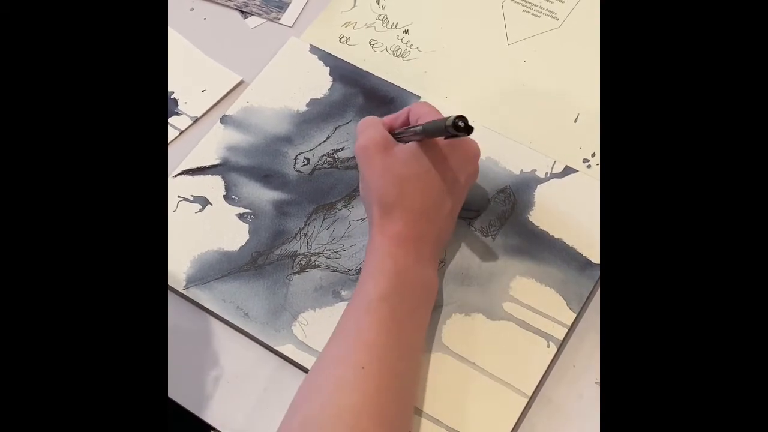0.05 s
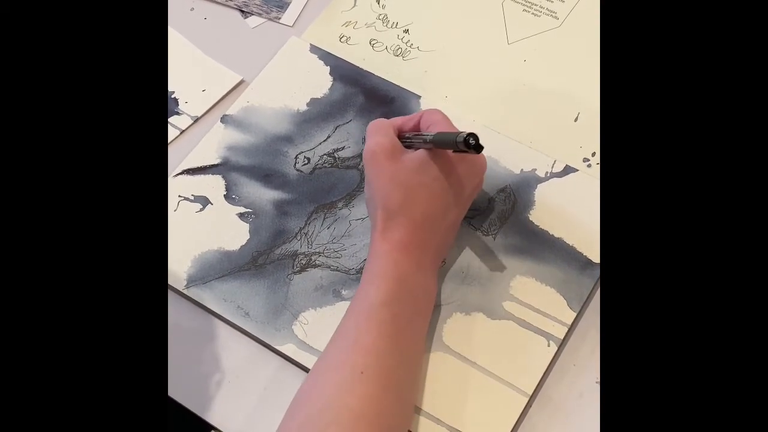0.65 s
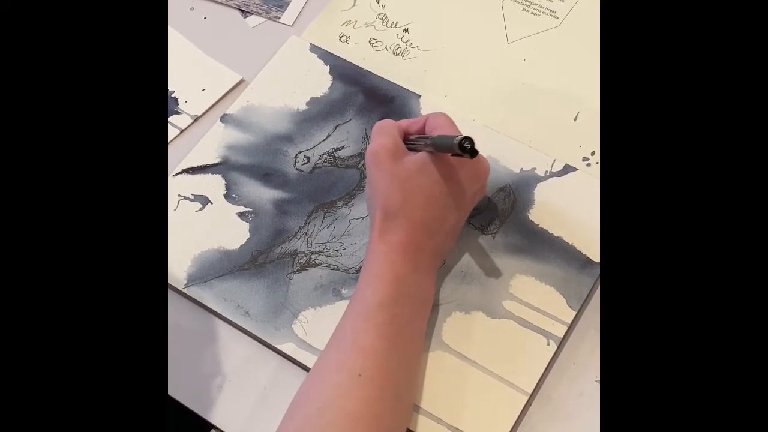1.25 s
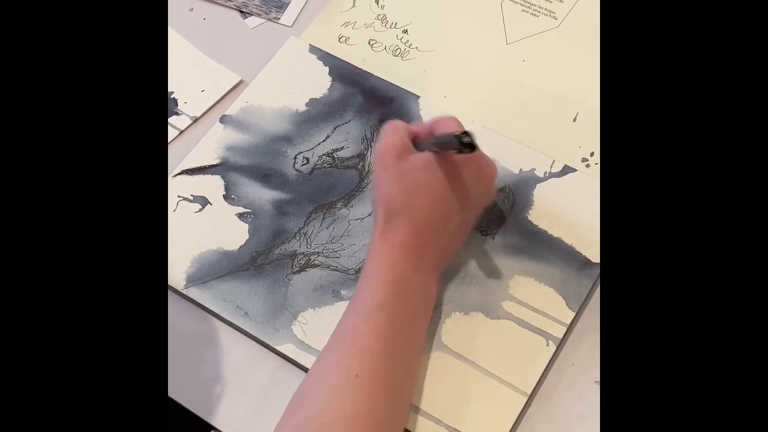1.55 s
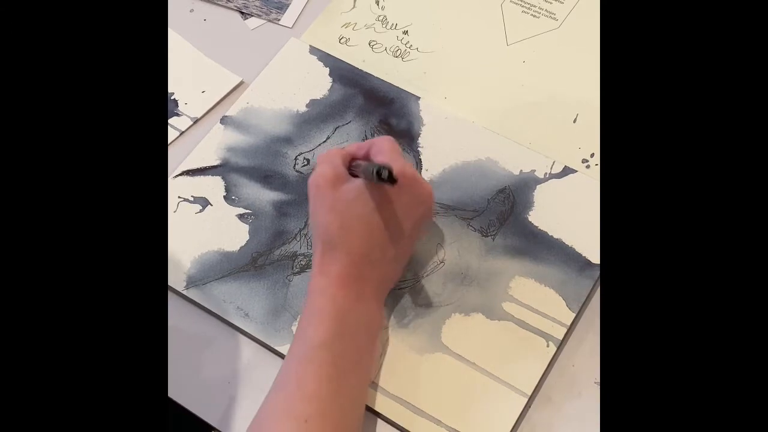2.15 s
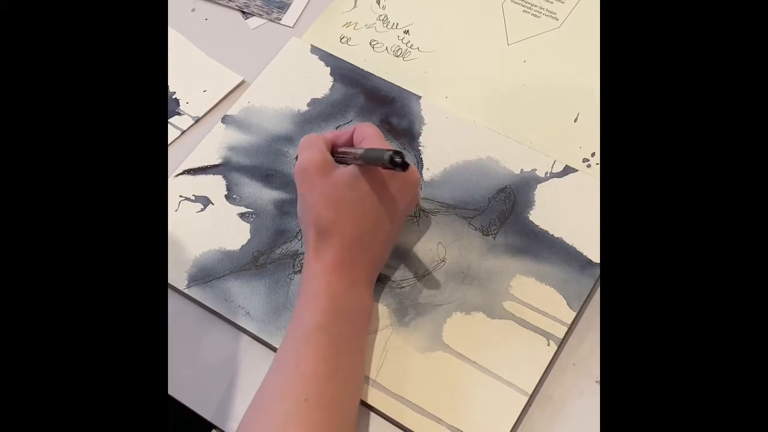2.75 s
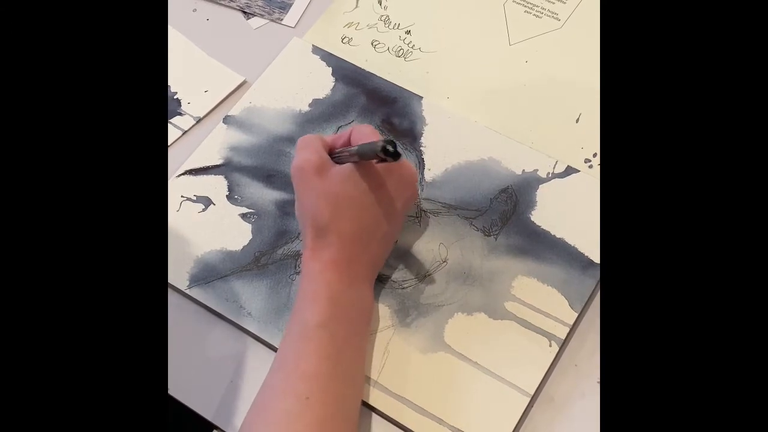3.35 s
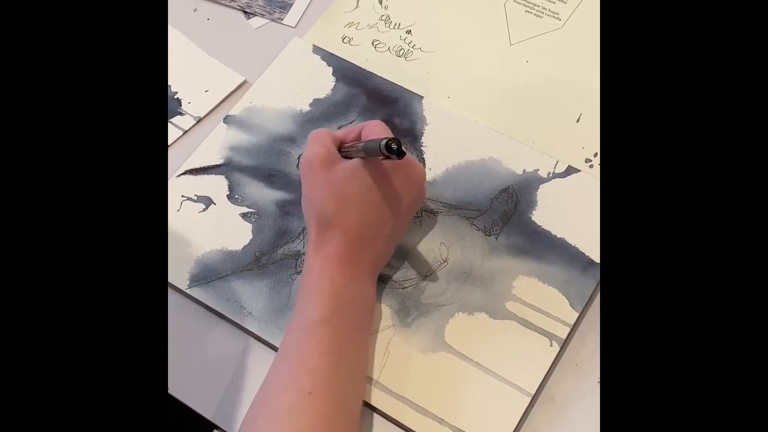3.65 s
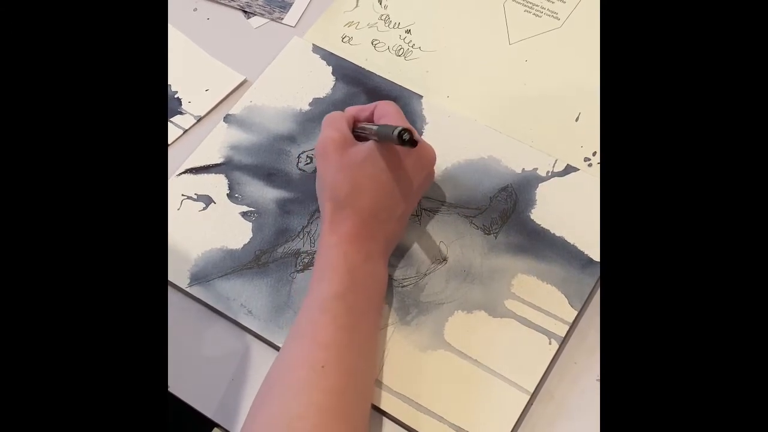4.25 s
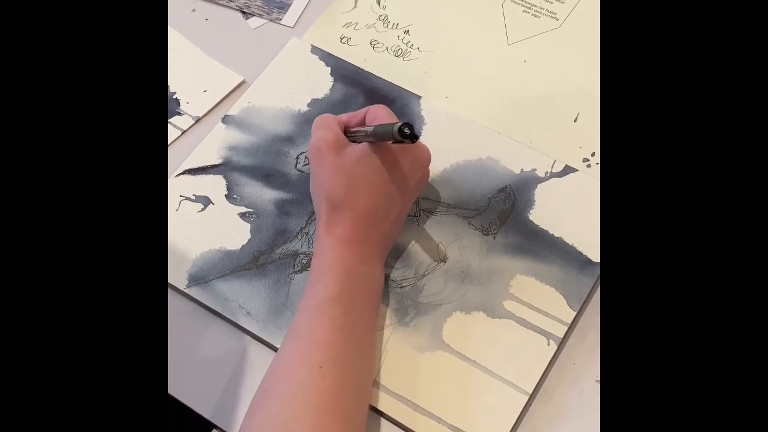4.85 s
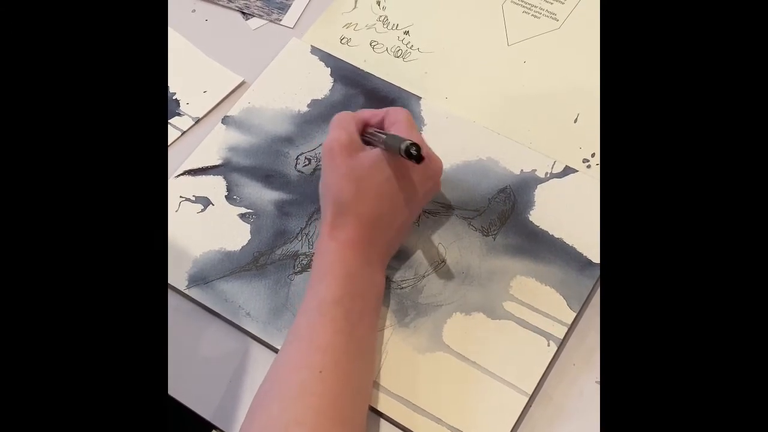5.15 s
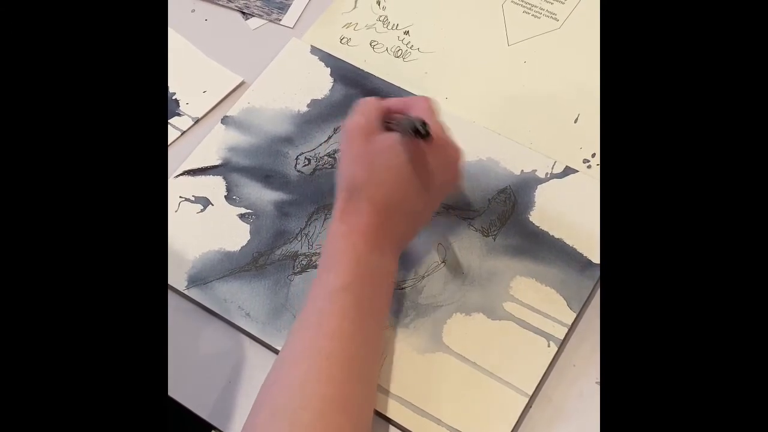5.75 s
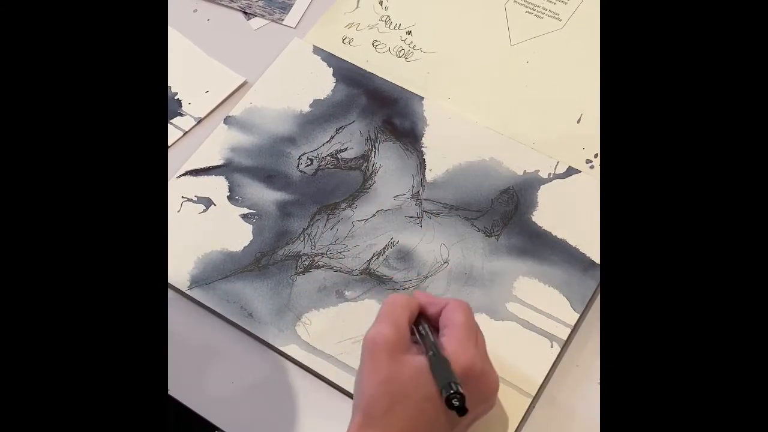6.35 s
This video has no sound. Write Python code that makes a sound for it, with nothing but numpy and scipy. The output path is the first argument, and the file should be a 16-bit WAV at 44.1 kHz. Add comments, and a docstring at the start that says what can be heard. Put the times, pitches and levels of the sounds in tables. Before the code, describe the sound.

Quick, scratchy pen strokes and light nib ticks on paper come in bursts, in a quiet room with a low hum.

```python
"""Pen sketching on paper

A fine-tip pen makes quick short strokes on thick paper on a table in a small quiet room. The nib ticks
as it lands, catches on the paper's tooth and snags on coarse fibres; sheet and board colour the scratch.
The fingers brush along, and near the end the hand slides to a new place. Ventilation rumbles in the
room's low modes. Heard through two close microphone ports."""
import sys
import numpy as np
from scipy import signal
from scipy.fft import rfft, irfft
from scipy.io import wavfile

SR = 44100
rng = np.random.default_rng(int(sys.argv[2]) if len(sys.argv) > 2 else 0)


def inscribe(sig):
    """Save sig as 16-bit PCM at rate SR to the path in sys.argv[1].

    A 1-D sig is mono; a 2-D sig holds one channel per row.
    Samples are clipped to [-1, 1] before scaling.
    """
    pcm = np.round(np.clip(np.atleast_2d(sig).T, -1, 1) * 32767)
    wavfile.write(sys.argv[1], SR, pcm.astype(np.int16))


N = 282681
HZ = np.maximum(np.arange(N // 2 + 1) * SR / N, 1)
TIME = np.arange(N) / SR

# pen strokes: t/s, length/s, level/dB, landing (0 glides in .. 1 drops on), sheet rasp/dB
STROKES = [(0.027, 0.1, -48.5, 0.4, -3), (0.122, .16, -51.5, 0.095, -3.5), (0.42, 0.062, -63, 0.43, 1),
           (0.504, 0.052, -55.5, 0.85, -6.5), (0.576, 0.055, -62.5, 0.82, 1.5),
           (0.651, 0.057, -53.5, 0.58, -2.5), (0.712, 0.086, -59, 0.17, 0.5), (0.808, 0.059, -55, 0.61, -4),
           (0.875, 0.073, -56, 0.21, 1), (0.964, 0.057, -53.5, 0.52, -4), (1.029, 0.082, -59.5, 0.39, 4),
           (1.115, 0.051, -52.5, 0.85, -1), (1.183, 0.058, -55, 0.32, 0.5), (1.252, 0.061, -53, 0.81, -2),
           (1.328, 0.041, -60, 0.57, 3), (1.359, 0.11, -54.5, 0.37, 0), (1.479, 0.12, -50.5, 0.12, -3.5),
           (1.934, 0.074, -58, 0.51, -1.5), (2.021, 0.059, -56.5, 0.89, -2), (2.085, 0.064, -50.5, 0.2, -4),
           (2.289, 0.085, -66.5, 0.64, 1), (2.393, 0.076, -55, 0.18, -6.5), (2.493, 0.084, -53, 0.88, -2),
           (2.576, 0.074, -51.5, 0.32, -9.5), (2.808, 0.1, -62, .1, -4.5), (2.911, 0.099, -57, 0.11, 1.5),
           (3.018, 0.068, -59, 0.27, 0), (3.096, 0.07, -52.5, 0.54, 5), (3.17, 0.096, -54.5, 1, -1),
           (3.398, 0.097, -51, 1, -1), (3.458, 0.074, -56.5, .5, -2.5), (3.525, 0.086, -51, 0.061, -0.5),
           (3.633, 0.075, -51, 0.45, -3), (3.779, .15, -74, 0.18, -5), (4.089, 0.084, -57, 0.024, 1),
           (4.192, 0.071, -52.5, 0.29, -1), (4.269, 0.086, -55, 0.7, -1), (4.545, 0.077, -63.5, .49, 0.5),
           (4.648, 0.051, -57.5, 0.86, -0.5), (4.765, 0.067, -55.5, 0.043, -1.5),
           (4.88, 0.033, -51.5, 0.29, 2.5), (4.934, 0.1, -54.5, 0.56, -1.5),
           (5.091, 0.044, -67.5, 0.12, -13), (5.195, 0.029, -70, .25, 2.5), (5.251, 0.088, -67.5, 0.27, -5),
           (5.345, 0.097, -61, 0.18, -2.5), (6.199, .12, -72, 0.056, -12)]
FIRM_DB = -49.5  # level of a firm stroke


def from_db(db):
    """Decibels to gain."""
    return 10 ** (np.asarray(db) / 20)


def unit_rms(x):
    """Scale to unit rms."""
    return x / np.sqrt(np.mean(x ** 2) + 1e-20)


def at_hz(points, hz):
    """Interpolate a table over log frequency."""
    f, value = np.transpose(points)
    return np.interp(np.log(hz), np.log(f), value)


def at_time(rows, t_s):
    """Interpolate each column of a table at one moment."""
    times, *columns = np.transpose(rows)
    return [np.interp(t_s, times, column) for column in columns]


def colour(spectrum, modes, hz):
    """Unit-power gain curve: smooth spectrum with resonant peaks."""
    lift = 1 + sum((from_db(db) ** 2 - 1) / (1 + (2 * (hz - f) / width) ** 2) ** 2
                   for f, width, db in modes)
    return unit_rms(from_db(at_hz(spectrum, hz)) * np.sqrt(np.abs(lift)))


def bell(hz, centre_hz, sigma_oct):
    """Gaussian of height 1 over log frequency."""
    return np.exp(-.5 * (np.log2(hz / centre_hz) / sigma_oct) ** 2)


def drift(rate_hz, size):
    """Random wander between unit-variance points."""
    steps = np.arange(size) * rate_hz / SR
    return np.interp(steps, np.arange(4096), rng.standard_normal(4096))


def minimum_phase(db):
    """Causal response for a gain curve: resonances ring only after each click."""
    cepstrum = irfft(np.log(from_db(db)))
    half = len(cepstrum) // 2
    return np.exp(rfft(cepstrum * np.r_[1, np.full(half - 1, 2), 1, np.zeros(half - 1)]))


def add(track, start_s, sound):
    """Mix a sound into a track."""
    i = max(0, int(start_s * SR))
    track[i:i + len(sound)] += sound[:N - i]


def diffuse(pair):
    """Diffuse field: two independent spectra become left and right, alike in the bass."""
    # left-right likeness: f/Hz, correlation
    likeness = [(60, .999), (130, .995), (280, .93), (550, .35), (1100, .4), (1600, .9), (3000, .6),
                (8000, .15), (11500, .5), (14200, .98)]
    alike = at_hz(likeness, HZ)
    mid = np.sqrt((1 + alike) / 2) * pair[0]
    side = np.sqrt((1 - alike) / 2) * pair[1]
    return np.array([mid + side, mid - side])


def ventilation(level_db=-46.5):
    """Steady air rumble that swells and fades in the narrow room modes."""
    # air noise: f/Hz, relative density/dB
    spectrum = [(30, -29), (42, -1.5), (80, -1), (125, -9.5), (300, -10.5), (450, -12.5), (600, -19.5),
                (1000, -27), (2000, -42.5), (4200, -55), (6600, -55), (10000, -63), (15000, -80.5)]
    # low room modes: f/Hz, width/Hz, lift/dB
    modes = [(49.3, 4.9, 11.5), (67.2, 6.3, 9), (99.9, 4.9, 16.5), (110.1, 5.53, 22.5), (125.1, 6, 10),
             (144.3, 11.8, 11), (202.1, 6.5, 11.5), (227.2, 8.7, 8.5)]
    # leftward bias: f/Hz, left minus right/dB
    balance = [(40, .1), (110, .7), (300, 3.5), (900, 2)]
    air = diffuse(rfft(rng.standard_normal((2, N)))) * colour(spectrum, modes, HZ)
    sides = from_db(at_hz(balance, HZ) * np.array([[1], [-1]]) / 2)
    return from_db(level_db) * unit_rms(irfft(air * sides, N))


def room(dry, gap_s=0.0058, tail_db=-5, t60_s=0.46, treble_t60_s=0.31, treble_hz=4000):
    """Direct sound plus a short diffuse tail whose treble dies first; the ports hear it out of step."""
    # lead of the left port for sound from the table: f/Hz, phase/rad
    port_phase = [(100, 0), (520, -.95), (1300, -.1), (1950, .1), (2600, 1.2), (3700, .3), (4450, 1.15),
                  (4800, 2.3), (5220, 6.2), (7100, 7.5), (10000, 8.33), (14000, 9.4)]
    echoes = rng.standard_normal((2, N)) * (TIME > gap_s)
    slow, fast = [echoes * from_db(-60 * np.minimum(TIME / t60, 2)) for t60 in (t60_s, treble_t60_s)]
    treble = HZ ** 2 / (HZ ** 2 + treble_hz ** 2)
    tail = diffuse(rfft(slow) * (1 - treble) + rfft(fast) * treble) / np.sqrt(np.sum(slow[0] ** 2))
    ports = np.exp(1j * at_hz(port_phase, HZ) * np.array([[0], [-1]]))
    return irfft(rfft(dry) * (1 + from_db(tail_db) * tail) * ports, N)


def rub(pressure, spectrum, uneven_db):
    """Friction hiss of skin sliding unevenly over the sheet."""
    hiss = irfft(rfft(rng.standard_normal(N)) * colour(spectrum, [], HZ), N)
    return hiss * pressure * from_db(uneven_db * drift(62, N))


def heel(attack_s=0.018):
    """The heel of the hand pushes off quickly and slides to rest."""
    # heel on paper: f/Hz, relative density/dB
    spectrum = [(200, 6), (600, 0.5), (1000, -1), (1500, -2.5), (2100, -8), (2900, -22.5), (4500, -40)]
    # slides to a new place: t/s, level/dB, decay/s
    sweeps = [(5.765, -64.5, 0.055), (5.855, -62.5, .065), (6.069, -59, 0.081), (6.135, -66, 0.063)]
    pressure = np.zeros(N)
    for start_s, db, decay_s in sweeps:
        push = np.clip((TIME - start_s) / attack_s, 0, 1)
        pressure += from_db(db) * push * np.exp(-np.maximum(TIME - start_s - attack_s, 0) / decay_s)
    return rub(pressure, spectrum, uneven_db=1.0)


def fingers(level_db=-66.5, follow=0.71, lag_s=0.067, spread_s=0.082):
    """Fingers brush the sheet around each stroke; quick hatching merges into one soft rub."""
    # skin on paper: f/Hz, relative density/dB
    spectrum = [(200, 11.5), (600, -4), (1400, -1), (2300, -4.5), (3500, -11.5), (7000, -29), (12000, -40)]
    power = np.zeros(N)
    for start_s, _, db, _, _ in STROKES:
        swell = np.exp(-.5 * ((TIME - start_s - lag_s) / spread_s) ** 2)
        power += from_db(level_db + follow * (db - FIRM_DB)) ** 2 * swell
    return rub(np.sqrt(power), spectrum, uneven_db=3.5)


def taps(scrape=2.3, min_decay_s=0.0018, size=4096):
    """Each impact is a click and a dying scrape; the narrower its band, the longer it rings."""
    # pen taps and chirps, hand knocks on the board: t/s, level/dB, f/Hz, width/oct
    impacts = [(.024, -51, 720, 1.1), (.148, -59, 12500, .7), (.42, -54, 1200, 1.2),
               (.815, -54.5, 12000, .7), (.965, -57, 12500, .7), (1.119, -59, 12500, .7),
               (1.255, -63, 12000, .9), (1.337, -49.5, 1090, 1.2), (1.348, -45, 690, 0.26),
               (1.432, -49, 1260, 0.32), (1.914, -50, 900, 0.73), (2.275, -64.5, 3030, 0.19),
               (2.491, -68, 10000, 1), (3.175, -60, 10000, .8), (3.255, -48, 980, 1.2),
               (3.398, -50, 10700, 0.76), (4.65, -66, 6500, 1.8), (4.809, -59, 4000, 2.6),
               (5.783, -65.5, 2100, 1.2), (6.127, -47, 700, 0.64), (6.201, -40, 92, 1.2)]
    out, t = np.zeros(N), np.arange(size) / SR
    for start_s, db, hz, width_oct in impacts:
        low_hz, high_hz = hz * 2 ** (-width_oct / 2), hz * 2 ** (width_oct / 2)
        fade = np.exp(-t / (min_decay_s + 0.79 / (high_hz - low_hz)))
        burst = (t == 0) + scrape * rng.standard_normal(size) * fade / np.sqrt(np.sum(fade ** 2))
        band = signal.butter(2, [low_hz, high_hz], "band", fs=SR, output="sos")
        tap = unit_rms(signal.sosfilt(band, burst))
        add(out, start_s, from_db(db) * tap * np.sqrt(np.mean(fade ** 2)))
    return out


def tooth(speed, peak_rate_hz, spread_db, hiss, uneven_db):
    """The nib snaps off paper fibres, more often at speed, over a smooth friction hiss."""
    size = len(speed)
    caught = rng.random(size) < peak_rate_hz * (.3 + .7 * speed) / SR
    signs = rng.choice([-1, 1], size)
    snaps = caught * signs * from_db(spread_db * np.minimum(rng.exponential(1, size), 3.5))
    friction = unit_rms(snaps) + hiss * rng.standard_normal(size)
    force = friction * speed * from_db(uneven_db * drift(260, size))
    return force * np.sqrt(np.sum(speed ** 2) / np.sum(force ** 2))


def nib_speed(t, length_s, landing):
    """Relative speed rises, then falls to rest; a harder landing starts faster and peaks sooner."""
    rise_s = length_s * np.interp(landing, [0, 1], [0.6, 0.068])
    return np.sin(np.pi / 2 * np.interp(t, [0, rise_s, length_s], [0.51 * landing, 1, 0]))


def touchdown(t, hz, click=5, decay_s=0.0016):
    """Spectrum of the nib landing: a click and brief scrape knock on the board under the sheet."""
    tick = click * (t == 0) + rng.standard_normal(len(t)) * np.exp(-t / decay_s)
    return rfft(tick) * minimum_phase(-8 + 8 * bell(hz, 850, 1))


def nib_colour_db(hz, start_s, level_db, light_db=-57):
    """Pressure brightens the scratch; place and pen angle set its tilt, bite and top-octave sheen."""
    # tone from place and angle: t/s, tilt/(dB/oct), bite/dB, sheen/dB
    angle = [(.1, -0.1, -5, -12.5), (.7, -1, 3.5, 4.5), (1.25, -1.05, 0.5, -2), (1.36, -1, -0.5, -9),
             (1.48, 0.1, -4, -8), (1.95, -1.4, -2.5, 0.5), (2.57, -1.1, -9.5, -9.5),
             (2.95, -1.1, -1.5, -15), (3.12, 0.4, 0, -4.5), (3.42, 0.5, -4, -3), (4.27, 1, -2.5, -5.5),
             (4.62, -1.5, -5.5, -6), (4.93, 0.3, -11, -11), (5.2, -2.9, 0.5, -3)]
    angle_tilt, bite_db, sheen_db = at_time(angle, start_s)
    pressure_tilt = -3 + 0.3 * (max(level_db, light_db) - FIRM_DB)
    octaves = np.log2(np.clip(hz, 700, 11000) / 3000)
    bite = bell(hz, 3860, 0.55)
    sheen = bell(np.minimum(hz, 12000), 12000, 0.34)
    return (pressure_tilt + angle_tilt) * octaves + bite_db * bite + sheen_db * sheen


def pen(snag_share=0.41, spot_step_hz=150.3, release_s=0.02, size=8192):
    """Fine tooth, coarse snags and the landing drive the resonances of sheet and board."""
    # nib on paper: f/Hz, relative density/dB
    scratch = [(150, -13.5), (350, -8), (650, -9.5), (1050, -12.5), (1600, -5.5), (2000, -9.5), (3000, -9),
               (4200, -7.5), (5500, -10), (7200, -11), (8500, -10), (10000, -8), (11300, -9), (13300, -7.5),
               (15500, -8)]
    # modes of sheet, board and pen: f/Hz, width/Hz, lift/dB
    modes = [(671, 39, 5), (943, 87, 7.5), (1234, 420, 6.5), (1704, 58, 3), (2390, 380, 5),
             (3980, 140, 2.5), (6180, 130, 4), (7140, 250, 5.5), (10000, 360, 3.5)]
    # the sheet's hollow note at the place drawn on: t/s, f/Hz, lift/dB
    hollow = [(.6, 760, 3.5), (1.35, 735, 6), (1.95, 920, 1), (2.6, 1330, 5), (3.5, 1080, 2.5),
              (4.2, 1700, 2), (4.93, 1190, -3), (5.3, 2100, 5.5)]
    out, t = np.zeros(N), np.arange(size) / SR
    hz = np.maximum(np.arange(size // 2 + 1) * SR / size, 1)
    body_db = 20 * np.log10(colour(scratch, modes, hz))
    rasp = bell(hz, 1580, 0.66)
    snagged = snag_share * rasp
    spot_spread_db = 4 * np.clip(hz / 1070, 0, 1)  # low modes belong to the whole board and vary less
    release = np.clip((t[-1] - t) / release_s, 0, 1) ** 2
    for start_s, length_s, db, landing, rasp_db in STROKES:
        speed = nib_speed(t, length_s, landing)
        grain = tooth(speed, peak_rate_hz=1700, spread_db=0.8, hiss=0.56, uneven_db=0.1)
        snags = tooth(speed, peak_rate_hz=220, spread_db=2.5, hiss=0.12, uneven_db=2.3)
        friction = rfft(grain) * np.sqrt(1 - snagged) + rfft(snags) * np.sqrt(snagged)
        drive = irfft(friction + landing ** 2 * touchdown(t, hz))
        note_hz, note_db = at_time(hollow, start_s)
        sheet_db = body_db + note_db * bell(hz, note_hz, 0.2) + rasp_db * rasp
        stroke_db = db + nib_colour_db(hz, start_s, db) + sheet_db
        # each spot favours its own resonances: crossfade as the nib travels from one to the next
        travelled = np.sin(np.pi / 2 * np.cumsum(speed ** 2) / np.sum(speed ** 2)) ** 2
        for share in (1 - travelled, travelled):
            ripple = np.interp(hz / spot_step_hz, np.arange(size), rng.standard_normal(size))
            response = minimum_phase(stroke_db + spot_spread_db * ripple)
            add(out, start_s, release * irfft(rfft(drive * share) * response))
    return out


def scene():
    """Pen and hand on the table, in the rumbling room."""
    return room(pen() + taps() + fingers() + heel()) + ventilation()


def record(dry):
    """Short fades at both ends and a steep low-pass."""
    fade_s, cutoff_hz = 0.004, 15750
    fade = np.clip(np.minimum(TIME, TIME[-1] - TIME) / fade_s, 0, 1)
    return signal.sosfilt(signal.ellip(12, .1, 80, cutoff_hz, fs=SR, output="sos"), dry * fade)


dry = scene()
out = record(dry)
inscribe(out)
```